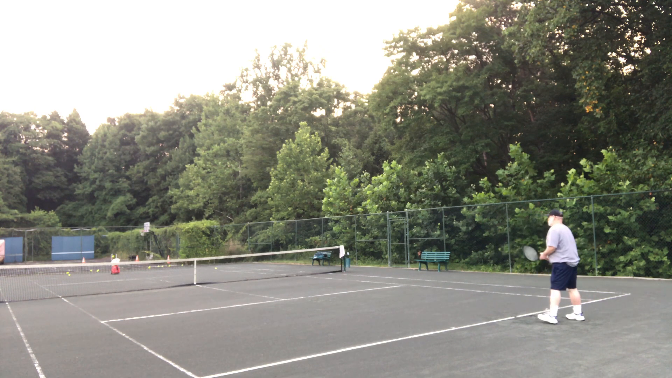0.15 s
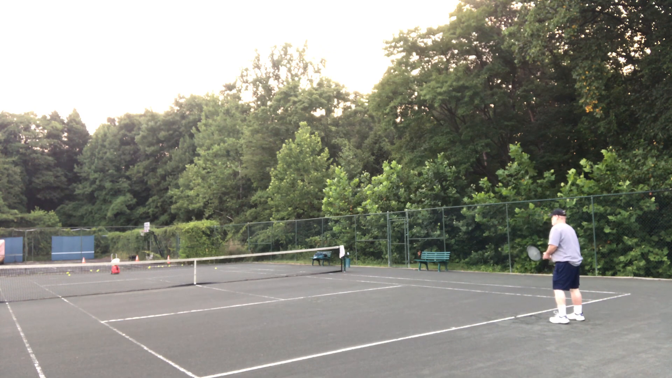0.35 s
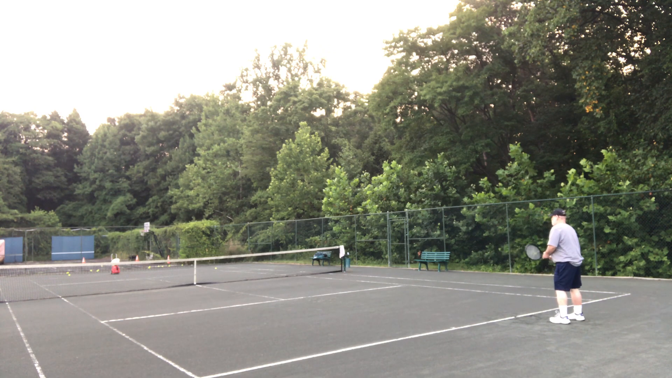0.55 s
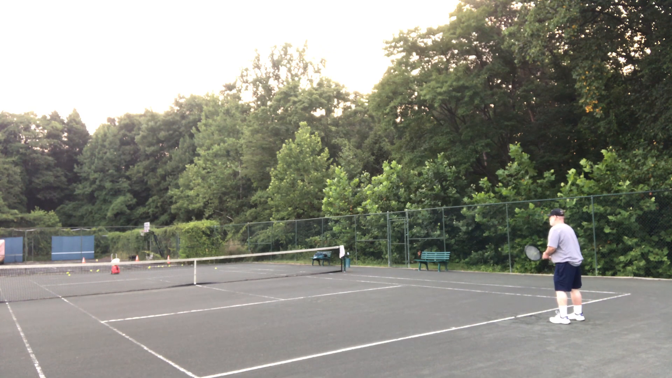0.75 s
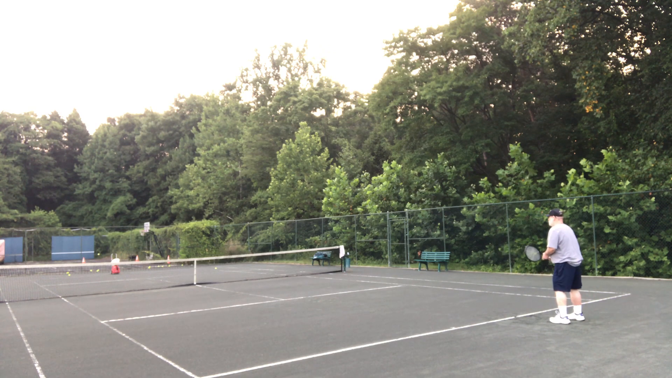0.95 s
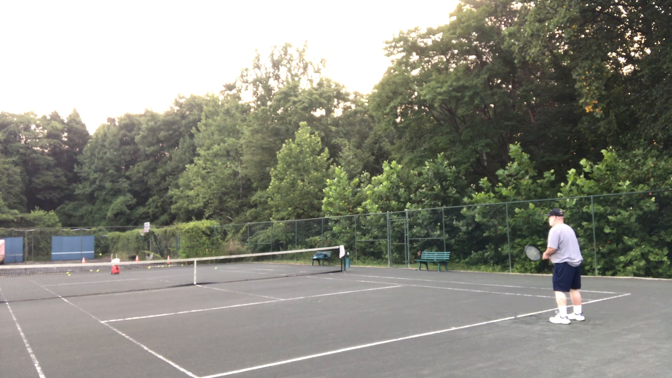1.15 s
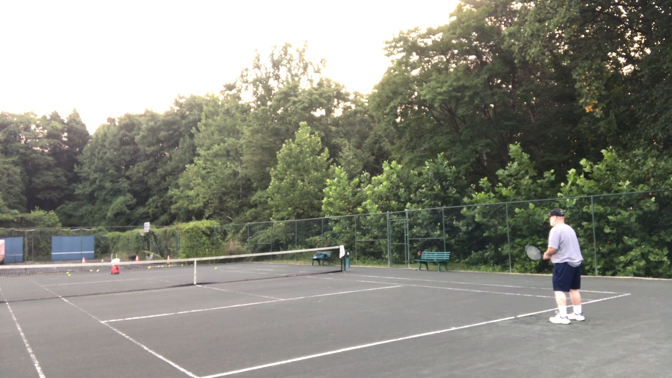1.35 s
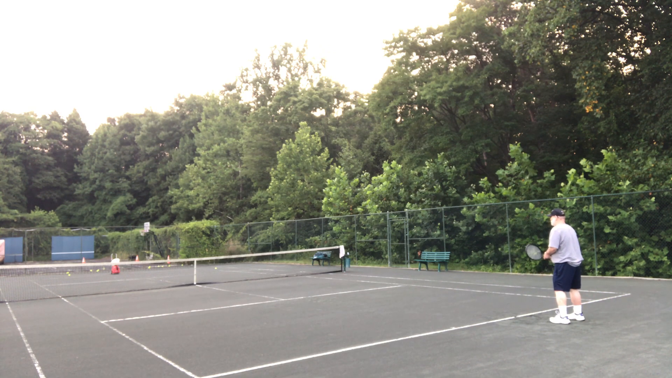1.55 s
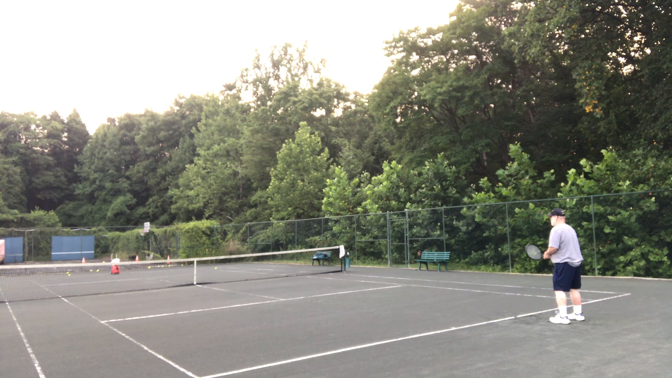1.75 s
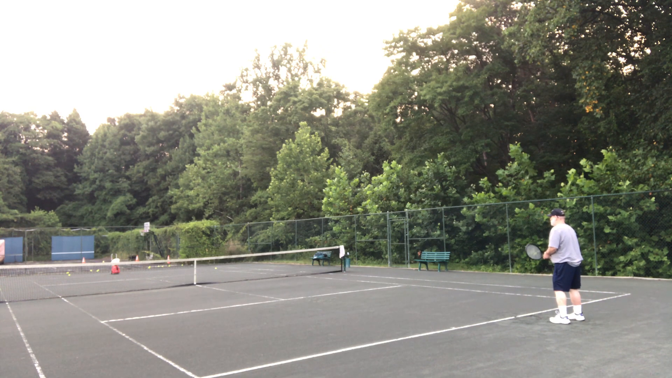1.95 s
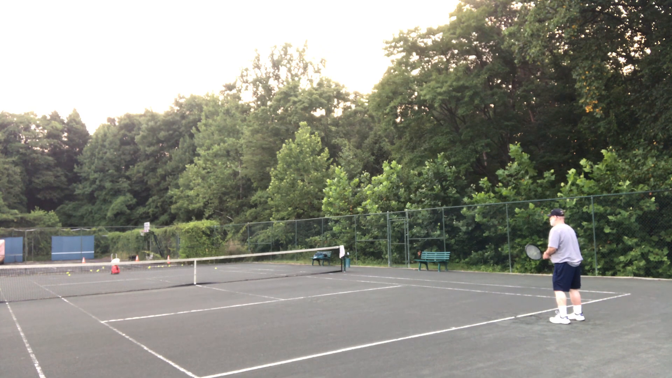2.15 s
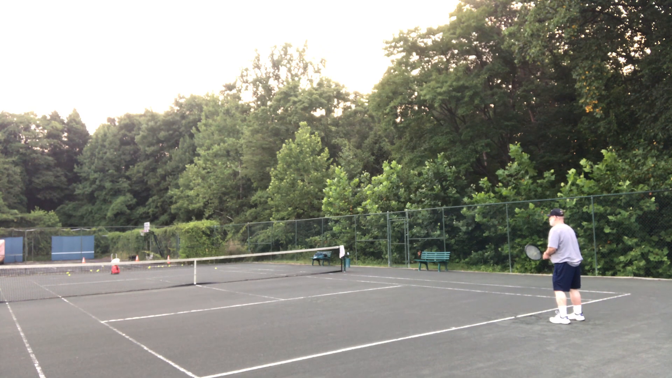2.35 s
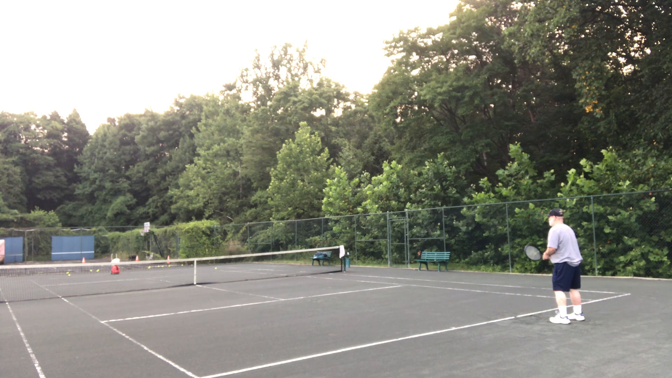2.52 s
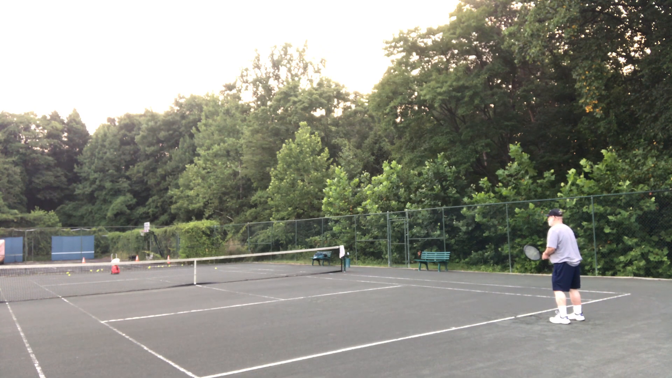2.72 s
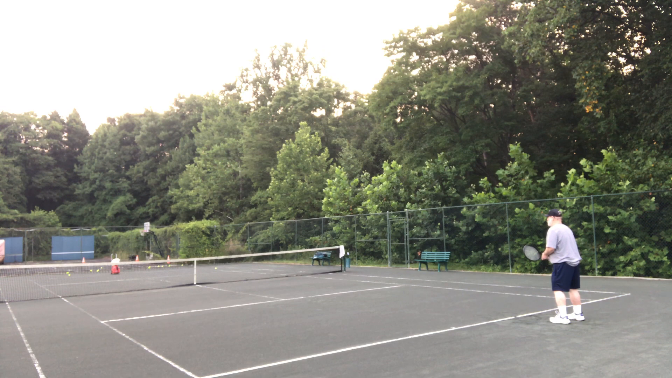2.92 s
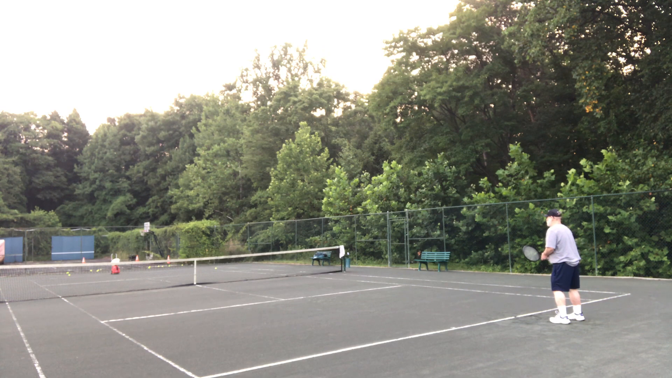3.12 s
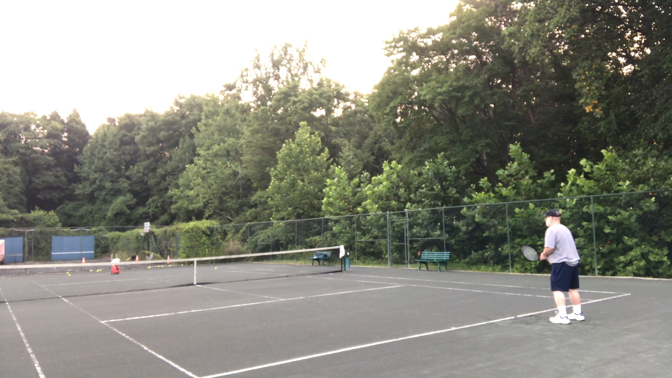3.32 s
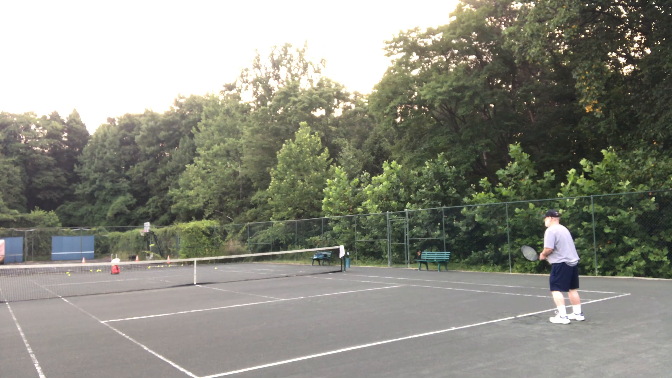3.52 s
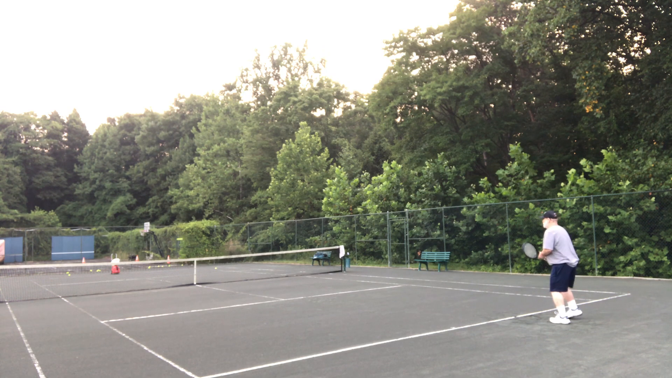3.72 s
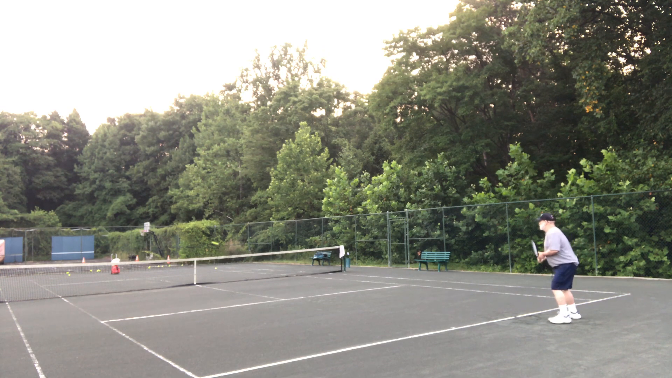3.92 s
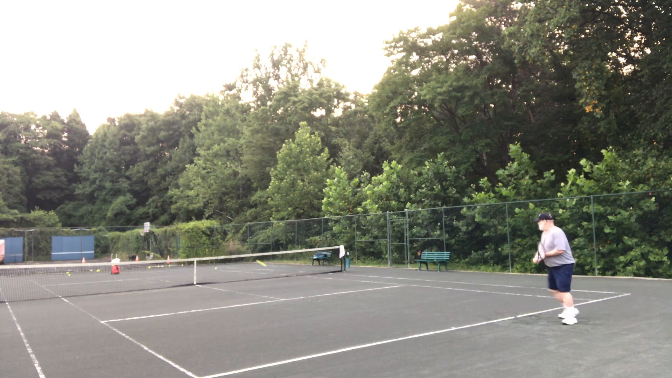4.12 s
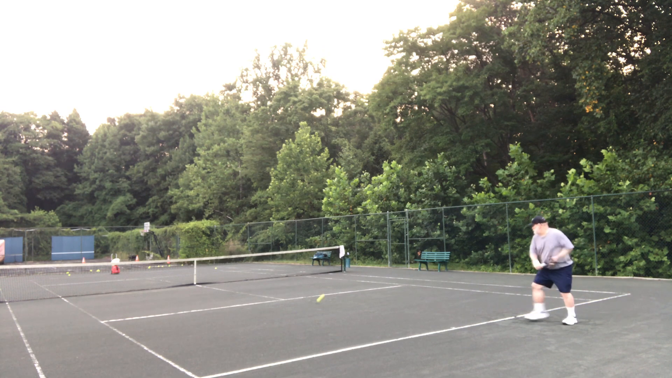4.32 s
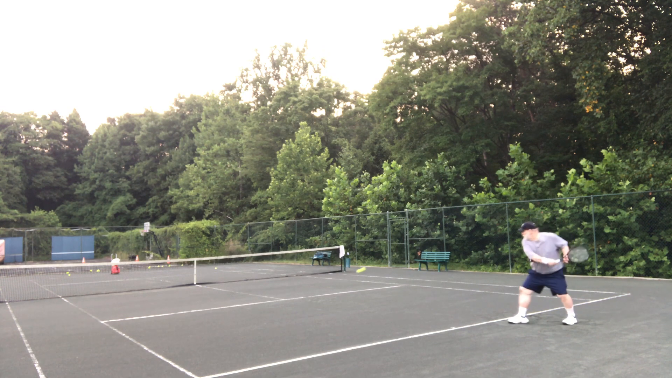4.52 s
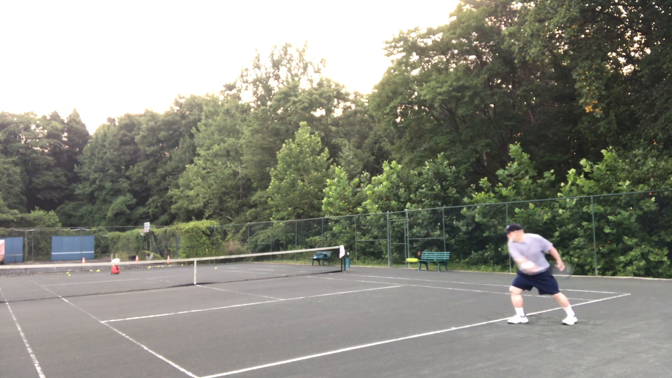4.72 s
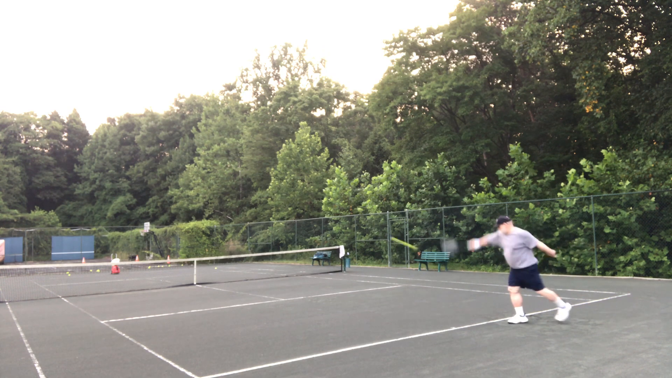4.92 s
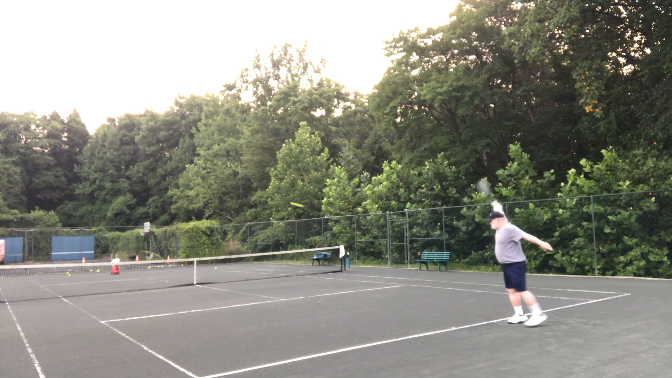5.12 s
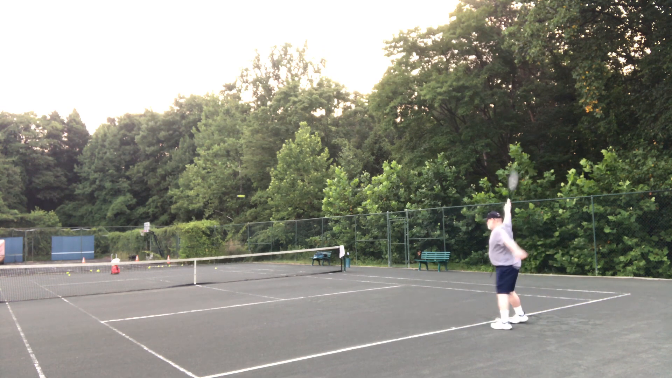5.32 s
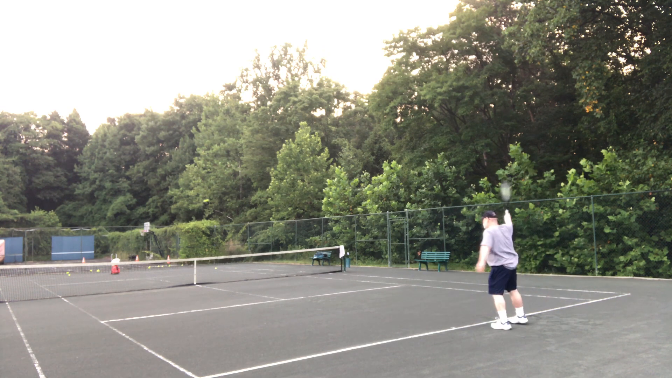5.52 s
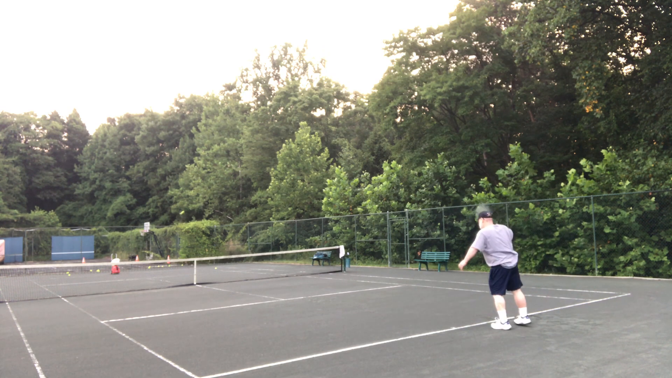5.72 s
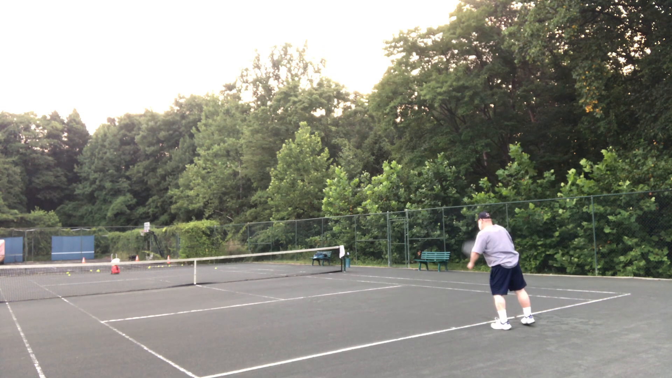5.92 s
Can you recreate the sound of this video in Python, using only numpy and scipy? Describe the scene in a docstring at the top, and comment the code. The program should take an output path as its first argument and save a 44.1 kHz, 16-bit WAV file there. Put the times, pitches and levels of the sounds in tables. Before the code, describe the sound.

Crickets and birds sound outdoors as a distant machine pops out a tennis ball, which bounces and is struck amid gritty footsteps.

```python
"""Evening tennis practice on a clay court at the edge of a wood.
From the start: crickets trill over distant traffic and a ball machine's whine; birds sing; a few steps.
3.3 s: the far machine pops out a ball with a puff of air. From 3.8 s: shoes land and slide on the grit.
4.4 s: the ball bounces, its hollow wall ringing. 4.9 s: the racket strikes, the strings ring, and fence
and trees scatter the hit. 5.3 s: a last step and slide."""
import sys
import numpy as np
from scipy import signal
from scipy.fft import rfft, irfft, next_fast_len
from scipy.io import wavfile

SR = 44100
rng = np.random.default_rng(int(sys.argv[2]) if len(sys.argv) > 2 else 0)


def wav_record(signal):
    """Record a signal, one row per channel, as 16-bit PCM in the file named by sys.argv[1]."""
    frames = np.transpose(np.atleast_2d(signal))
    bounded = np.clip(frames, -1, 1)
    # unit amplitude maps onto the largest positive 16-bit level
    quanta = np.round(bounded * 32767).astype(np.int16)
    wavfile.write(sys.argv[1], SR, quanta)


N = 267687
TIME = np.arange(N) / SR

# Levels are relative: spectra are normalised, and gains follow.
# modes of the string bed; of the hollow ball: f/Hz, level/dB, t60/s
STRING_MODES = [(608, -9, .5), (940, 1, .26), (1280, 0, .15), (1588, -11, .2), (1890, -2, .2),
                (2100, -1, .16), (2255, -5, .15), (2470, -7, .2)]
BALL_MODES = [(705, -15.5, .04), (1070, -4, .015), (1810, -19, .05), (3187, -34, .04), (4160, -40, .03),
              (5330, -39, .02), (6755, -39, .025)]
# spectra of felt on strings; machine's air puff; dragging sole; fine grit: f/Hz, level/dB
RUB_SPECTRUM = [(300, -3), (1200, 2), (2200, 3), (3000, -2), (5500, -7), (8500, -12), (10000, -9.5),
                (11000, -17), (15500, -17)]
PUFF_SPECTRUM = [(60, -1), (130, -3), (195, 4.5), (280, -10), (385, 6.5), (500, -3.5), (700, -2),
                 (1100, -8), (1600, -12), (2500, -16), (4000, -20), (6500, -33), (10000, -37), (15000, -52)]
SOLE_SPECTRUM = [(150, -15), (500, -5.5), (1000, -1), (1500, 1.5), (2200, -3.5), (3500, -9.5),
                 (6000, -13.5), (10000, -27.5), (16000, -37)]
GRIT_SPECTRUM = [(800, -25), (2500, 5), (5000, 3.5), (8000, -1.5), (11000, -8), (15500, -12)]
# shoe landings: t/s, sole level/dB, grit level/dB
LANDINGS = [(.199, -63, -58), (0.389, -52.5, -68), (.93, -72, -60), (3.819, -46, -66), (4.11, -59, -55.5),
            (4.222, -82, -62.5), (4.51, -72, -59.5), (4.62, -59, -71), (4.993, -48, -60),
            (5.301, -46.5, -50.5)]
# shoe slides and pivots: t/s, length/s, sole level/dB, grit level/dB
SHOE_SLIDES = [(3.862, .11, -55.5, -60.5), (4.539, 0.076, -58.5, -65), (4.65, 0.12, -64, -68.5),
               (4.795, .18, -56.5, -53.5), (5.317, 0.096, -43.5, -62)]
# two birds' phrases (t within phrase); one held note: t/s, length/s, start, middle, end f/Hz, level/dB
WARBLE_PHRASE = [(0, .03, 3720, 3400, 3150, -59.5), (.052, .062, 2800, 2180, 2300, -60),
                 (.08, .037, 3600, 3020, 3300, -62.5), (.14, .048, 2180, 2280, 2600, -62),
                 (.213, .045, 2640, 2810, 3100, -55.5), (.29, .075, 3430, 3890, 3900, -56)]
WHISTLE_PHRASE = [(0, 0.087, 2730, 3040, 2850, -56), (.137, 0.038, 3710, 3510, 3000, -57),
                  (.173, .088, 2350, 2420, 2755, -52.5)]
HELD_NOTE = [(0.923, 0.082, 3265, 3205, 3280, -55)]
# phrase starts: t/s, level/dB
WARBLE_STARTS = [(.215, -6.5), (.71, -4.5), (2.035, -5.5), (2.505, -1.5), (2.972, -1.5), (3.435, -4.5)]
WHISTLE_STARTS = [(-.078, 0), (.355, -0.5)]
# rising chips deep in the trees: t/s, level/dB
CHIP_CALLS = [(0, -59.5), (.13, -59), (1.872, -58.5), (2.02, -60.5), (2.598, -53.5), (4.035, -58),
              (4.18, -57.5), (5.158, -53)]
# thin calls on one pitch: t/s, length/s, level/dB
PEEP_CALLS = [(.92, 0.088, -62.5), (1.025, 0.032, -64), (2.2, .25, -82)]
# near crickets: wing stroke rate/Hz, start f/Hz, end f/Hz, level/dB
NEAR_CRICKETS = [(52.76, 5030, 4350, -53), (42.7, 5060, 4320, -55.5)]
# spectra of far crickets; other insects; distant traffic and leaves: f/Hz, level/dB
CHORUS_SPECTRUM = [(3700, -30), (4200, -14.5), (4600, -2), (5000, -8.5), (5450, -3), (6000, -13.5),
                   (6700, -22.5), (8000, -72)]
SHRILL_SPECTRUM = [(8000, -31), (9000, 1), (9600, 6), (10100, -26), (13300, -15), (14500, -1), (15500, -12)]
TRAFFIC_SPECTRUM = [(20, -20), (40, -2), (65, 2), (125, 0), (250, -5.5), (480, -15.5), (930, -8.5),
                    (1400, -14), (2500, -28), (4000, -29), (7000, -32), (8500, -36), (10400, -42),
                    (15500, -42)]
# reverberation of the court; of the wood: f/Hz, t60/s
COURT_DECAY = [(100, 0.25), (400, 1), (1000, 0.85), (2500, 0.86), (6000, 1), (10000, 0.088), (15000, 0.14)]
WOOD_DECAY = [(2000, 0.72), (4000, 1), (9000, 0.52)]


def racket(at_s=4.9338, contact_s=.0044, rub_attack_s=.00041, rub_t60_s=.033):
    """Felt rubs the strings while the ball is squashed; it pops free and the strings ring."""
    t = TIME - at_s
    t_free = t - contact_s
    rub_envelope = amp(-24.5 - 60 * np.maximum(t, 0) / rub_t60_s) * np.clip(t / rub_attack_s, 0, 1)
    rub = rub_envelope * noise(RUB_SPECTRUM)
    ball = amp(-13.5) * pop(t_free, hz=1090, length_s=.00234, ring_db=9.3)
    ball += amp(-19) * thump(t_free, hz=269, width_s=.0023)
    strings = amp(-41.5) * ring(STRING_MODES, t_free)
    hit = echo(ball + rub + strings, delay_s=.00295, db=-13)  # off the ground
    carried = amp(-26.5) * ball + amp(-15) * (rub + strings)  # the bright part carries further
    return hit + scatter(carried, COURT_DECAY, gap_s=.0062)


def bounce(at_s=4.3806):
    """The ball lands on clay: a pop, a low push, a spit of grit."""
    t = TIME - at_s
    hit = amp(-28.5) * pop(t, hz=1224, length_s=.0019, ring_db=-4.5)
    hit += amp(-31.5) * thump(t - .0039, hz=207, width_s=.0013)
    hit += amp(-47) * bell(t - .0015, width_s=.0015) * noise(GRIT_SPECTRUM)
    return hit + amp(-35) * scatter(hit, COURT_DECAY, gap_s=.015)


def machine_shot(at_s=3.3375, puff_attack_s=.004, puff_t60_s=.36):
    """The ball leaves the barrel with a pop and a dying puff of air."""
    t = TIME - at_s
    ball = amp(-26.5) * pop(t, hz=1020, length_s=.0047, ring_db=-.5)
    shot = echo(ball, delay_s=.012, db=-7.5)
    puff_envelope = amp(-39.5 - 60 * np.maximum(t, 0) / puff_t60_s) * np.clip(1 + t / puff_attack_s, 0, 1)
    puff = puff_envelope * noise(PUFF_SPECTRUM)
    return shot + puff + amp(-18.5) * scatter(shot, COURT_DECAY, gap_s=.015)


def pop(t, hz, length_s, ring_db):
    """The ball's wall snaps back and rings on; its lowest mode bulges out as the others dent in."""
    envelope = np.sin(np.pi * np.clip(t / length_s, 0, 1)) ** .5
    snap = -envelope * np.sin(2 * np.pi * hz * t)
    return snap + amp(ring_db) * (ring(BALL_MODES[:1], t) - ring(BALL_MODES[1:], t))


def thump(t, hz, width_s):
    """Low push and pull of air as the ball squashes and recovers."""
    return -np.cos(2 * np.pi * hz * t) * bell(t, width_s)


def shoes(attack_s=.0092, release_s=.046, spray_db=-17, grain_spread_db=.5, grains_per_s=9000):
    """Steps crush grains: dull sole drag, fine crunch. Slides kick up a spray that patters down."""
    sole, grit = np.zeros((2, N))
    for at_s, sole_db, grit_db in LANDINGS:
        pressure = swell(at_s, attack_s, attack_s + release_s)
        sole += amp(sole_db) * pressure
        grit += amp(grit_db) * pressure
    for at_s, length_s, sole_db, grit_db in SHOE_SLIDES:
        rise_s = .56 * length_s
        pressure = swell(at_s, rise_s, length_s)
        spray = amp(sole_db + spray_db) * swell(at_s + rise_s, rise_s=.083, length_s=.25)
        sole += amp(sole_db) * pressure
        grit += amp(grit_db) * pressure + spray
    grains = rng.standard_normal((2, N))
    grains *= amp(grain_spread_db * np.minimum(rng.exponential(1, (2, N)), 4))
    grains *= rng.random((2, N)) < grains_per_s / SR
    steps = sole * coloured(grains[0], SOLE_SPECTRUM) + grit * coloured(grains[1], GRIT_SPECTRUM)
    return steps + amp(-16.5) * scatter(steps, COURT_DECAY, gap_s=.013)


def birds(chip_s=.018, chip_sweep_hz=(6400, 7800, 8950), peep_hz=9120):
    """Two songbirds echo off the wood's edge; the trees smear their song and some high calls."""
    notes = repeated(WARBLE_PHRASE, WARBLE_STARTS) + repeated(WHISTLE_PHRASE, WHISTLE_STARTS) + HELD_NOTE
    song = echo(whistles(notes, waver=.015), delay_s=.07, db=-8)
    song *= amp(.35 * drift(rate_hz=60))  # leaves break up the path
    chips = whistles([(at_s, chip_s, *chip_sweep_hz, db) for at_s, db in CHIP_CALLS], waver=.035)
    peep_notes = [(at_s, length_s, peep_hz, peep_hz, peep_hz, db) for at_s, length_s, db in PEEP_CALLS]
    peeps = whistles(peep_notes, waver=.0069)
    direct = song + amp(-17) * chips + amp(-4) * peeps
    into_trees = amp(.7) * song + amp(-.5) * chips + amp(-8) * peeps
    return direct + scatter(into_trees, WOOD_DECAY, gap_s=.004)


def whistles(notes, waver):
    """Slightly unsteady notes, each bending through three pitches."""
    out = np.zeros(N)
    wobble = 1 + waver * drift(rate_hz=250)
    for at_s, length_s, *pitches_hz, db in notes:
        progress = np.linspace(0, 1, max(round(length_s * SR), 2))
        hz = np.polyval(np.polyfit([0, .5, 1], pitches_hz, 2), progress)
        hz *= np.interp(at_s + progress * length_s, TIME, wobble)
        envelope = np.sin(np.pi * progress).clip(0) ** .5
        add(out, at_s, amp(db) * envelope * tone(hz))
    return out


def repeated(phrase, starts):
    """A phrase's notes, sung at each start."""
    return [(start_s + offset_s, *shape, db + effort_db)
            for start_s, effort_db in starts for offset_s, *shape, db in phrase]


def crickets(stroke_s=.0125, rate_jitter=.03, lull_at_s=2.305):
    """Each wing stroke is a falling tone; near crickets lull once, far ones blur into a band."""
    near = np.zeros(N)
    lull_db = -8.5 * bell(TIME - lull_at_s, width_s=.19)
    for stroke_hz, start_hz, end_hz, db in NEAR_CRICKETS:
        strokes = np.cumsum(stroke_hz * (1 + rate_jitter * drift(rate_hz=34))) / SR + rng.random()
        progress = np.minimum(strokes % 1 / stroke_hz / stroke_s, 1)
        hz = start_hz + (end_hz - start_hz) * progress + 35 * drift(rate_hz=79)
        effort = amp(db + lull_db + 1.7 * drift(rate_hz=44))
        near += effort * np.sin(np.pi * progress) ** 2 * tone(hz)
    far = amp(-62 + .31 * drift(rate_hz=90)) * noise(CHORUS_SPECTRUM)
    return near + far


def machine_motor(whine_hz=1416):
    """The motor's thin, wavering whine and low drone."""
    whine = amp(-70 + 1.15 * drift(rate_hz=3.57)) * tone(whine_hz + 5 * drift(rate_hz=25))
    drone = amp(-63) * noise([(70, -34), (100, -.5), (120, -.5), (140, -.5), (190, -45.5)])
    return whine + drone


def traffic(swell_db=.8):
    """Distant traffic and leaves: gently swelling noise."""
    return amp(-56.5 + swell_db * drift(rate_hz=4.215)) * noise(TRAFFIC_SPECTRUM)


def far_insects():
    """A faint, steady, high shrill."""
    return amp(-85.5) * noise(SHRILL_SPECTRUM)


def echo(x, delay_s, db):
    """x plus one reflection."""
    return x + amp(db) * np.interp(TIME - delay_s, TIME, x, left=0)


def scatter(x, decays, gap_s, count=2000):
    """Reflections off fence and foliage: sparse taps, each band with its own t60."""
    taps = np.zeros(SR)
    taps[rng.integers(0, SR, count)] = rng.choice([-1., 1.], count)
    hz, t, bands = signal.stft(taps, SR, nperseg=256)
    bands = bands * amp(-60 * t / lookup(decays, hz)[:, None])
    tail = signal.istft(bands, SR, nperseg=256)[1]
    out = np.zeros(N)
    add(out, gap_s, signal.fftconvolve(x, tail / np.linalg.norm(tail)))
    return out


def ring(modes, t):
    """Modes struck at t = 0."""
    t = np.maximum(t, 0)
    return sum(amp(db - 60 * t / t60_s) * np.sin(2 * np.pi * hz * t) for hz, db, t60_s in modes)


def tone(hz):
    """Sine following a frequency curve."""
    return np.sin(2 * np.pi * np.cumsum(hz) / SR)


def noise(spectrum):
    """Shaped noise, rms 1."""
    return coloured(rng.standard_normal(next_fast_len(N)), spectrum)[:N]


def coloured(x, spectrum):
    """x filtered by a spectrum, rms 1."""
    gain = amp(lookup(spectrum, np.fft.rfftfreq(len(x), 1 / SR)))
    return unit_rms(irfft(rfft(x) * gain, len(x)))


def drift(rate_hz):
    """Random wander, rms 1."""
    return unit_rms(np.interp(TIME * rate_hz, np.arange(N), rng.standard_normal(N)))


def swell(at_s, rise_s, length_s):
    """Triangular envelope."""
    return np.interp(TIME, [at_s, at_s + rise_s, at_s + length_s], [0, 1, 0])


def bell(t, width_s):
    """Gaussian envelope around t = 0."""
    return np.exp(-(t / width_s) ** 2)


def lookup(table, hz):
    """Interpolates over log frequency."""
    table_hz, values = np.transpose(table)
    return np.interp(np.log(hz + 1), np.log(table_hz + 1), values)


def add(mix, at_s, sound):
    """Mixes a sound in; at_s may be negative."""
    start = round(at_s * SR)
    sound = sound[max(-start, 0):]
    part = mix[max(start, 0):][:len(sound)]
    part += sound[:len(part)]


def amp(db):
    """dB to gain."""
    return 10 ** (np.asarray(db) / 20)


def unit_rms(x):
    """Scales to rms 1."""
    return x / np.sqrt(np.mean(x ** 2) + 1e-20)


def scene():
    """All sources, mono."""
    ambience = traffic() + machine_motor() + far_insects() + crickets() + birds()
    return (ambience + shoes() + machine_shot() + bounce() + racket())[None]


def record(dry, low_cut_hz=55, high_cut_hz=15900):
    """Microphone bass roll-off, then a steep band limit."""
    highpass = signal.butter(2, low_cut_hz, "highpass", fs=SR, output="sos")
    lowpass = signal.firwin(511, high_cut_hz, window=("kaiser", 9), fs=SR)
    return signal.oaconvolve(signal.sosfilt(highpass, dry), lowpass[None], "same")


dry = scene()
out = record(dry)
wav_record(out)
```